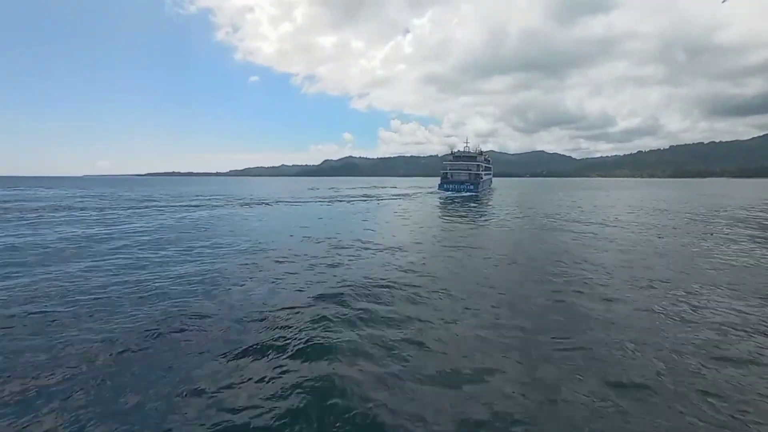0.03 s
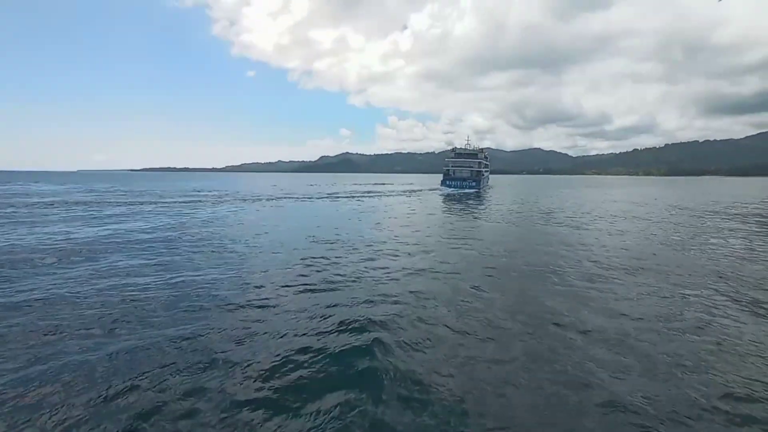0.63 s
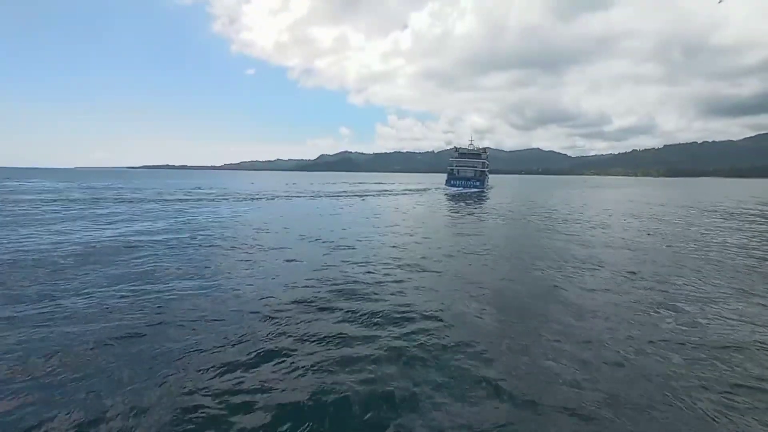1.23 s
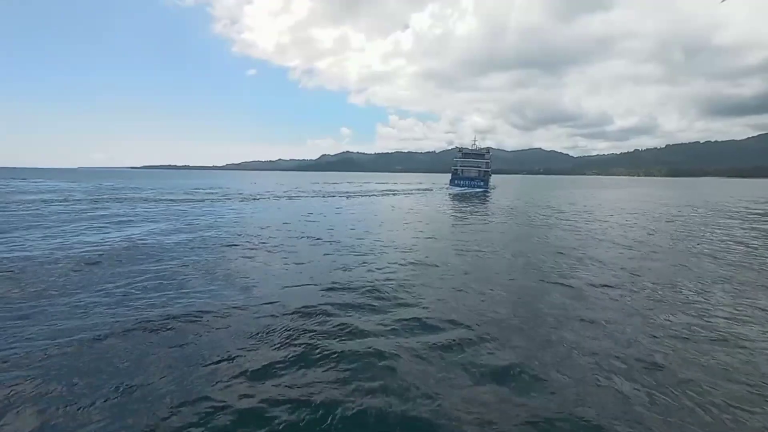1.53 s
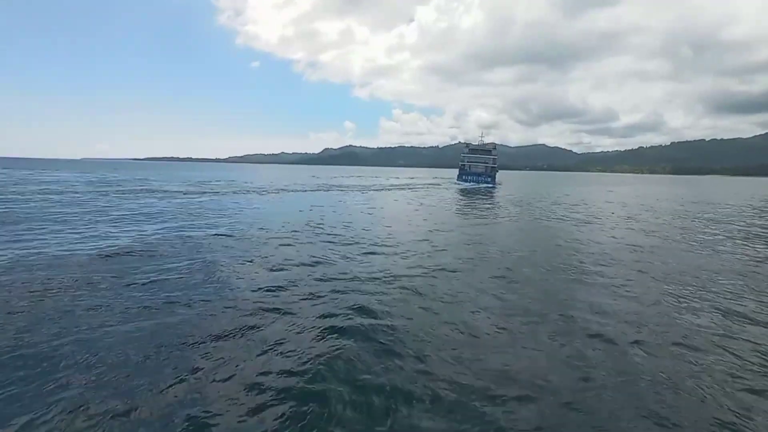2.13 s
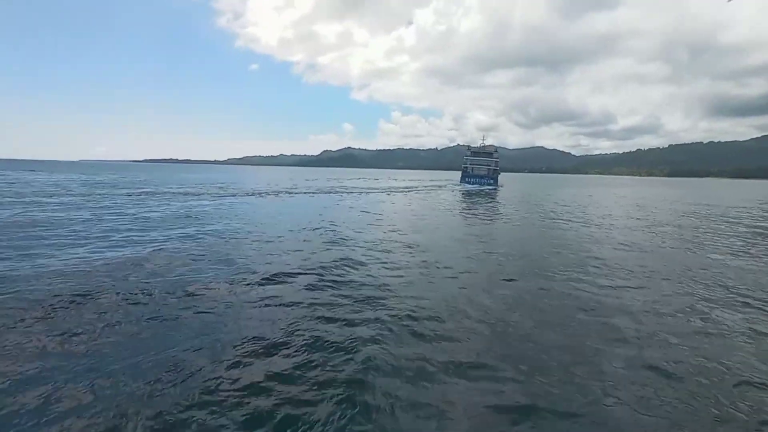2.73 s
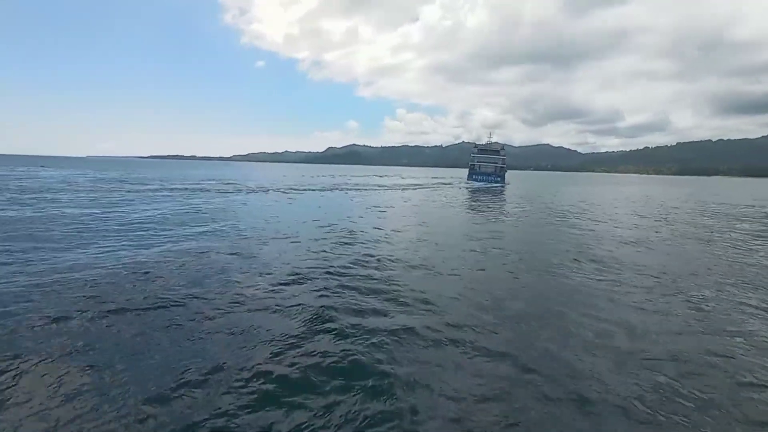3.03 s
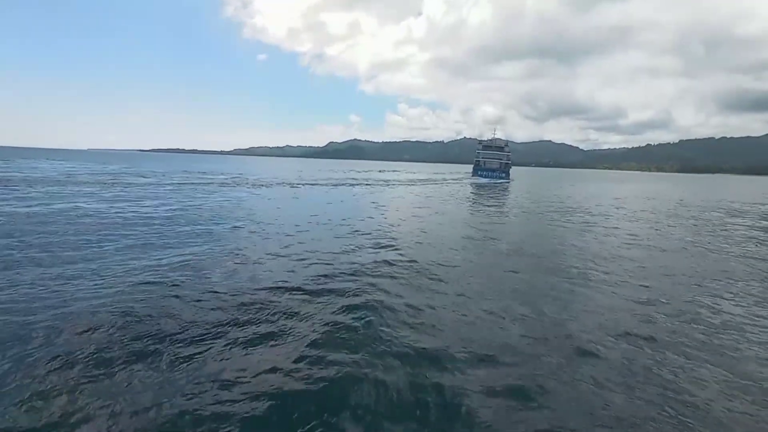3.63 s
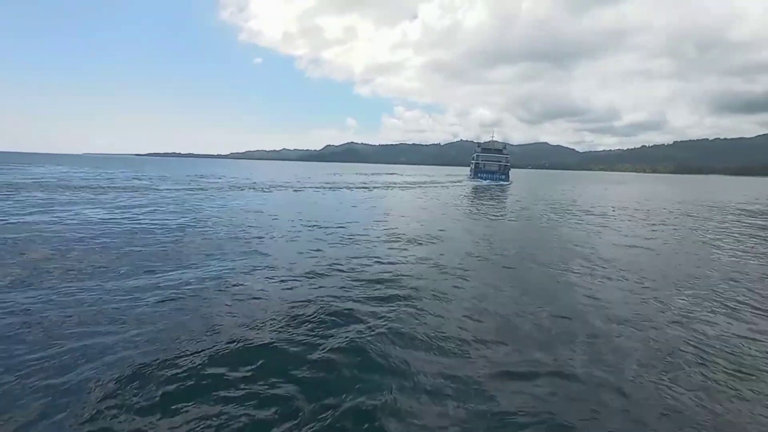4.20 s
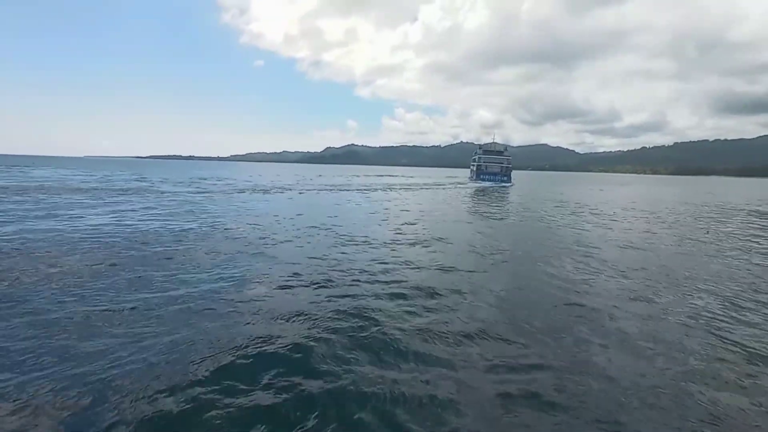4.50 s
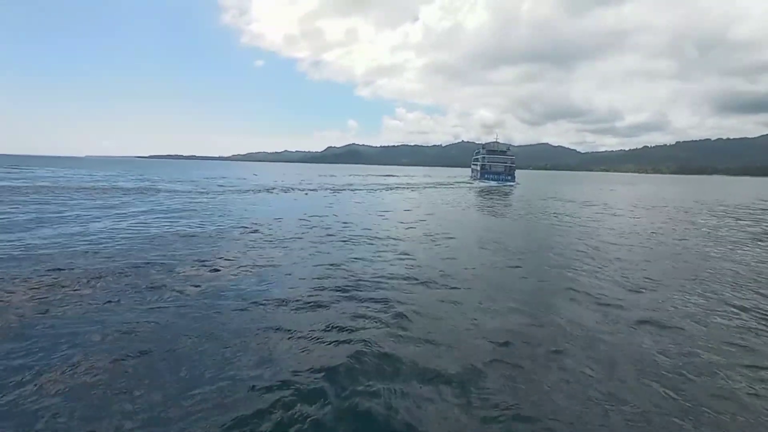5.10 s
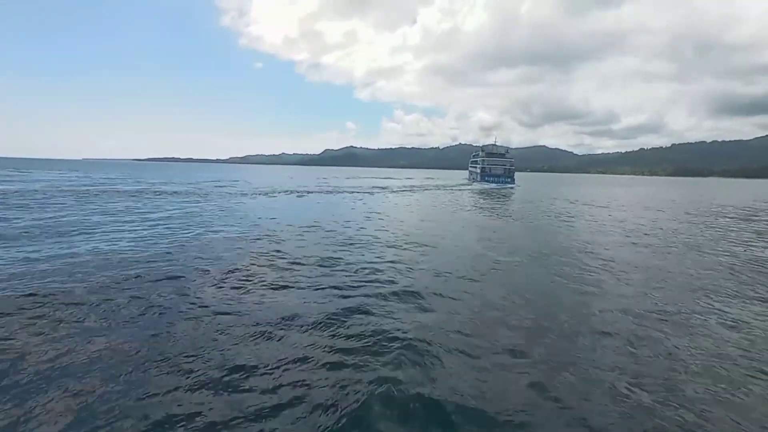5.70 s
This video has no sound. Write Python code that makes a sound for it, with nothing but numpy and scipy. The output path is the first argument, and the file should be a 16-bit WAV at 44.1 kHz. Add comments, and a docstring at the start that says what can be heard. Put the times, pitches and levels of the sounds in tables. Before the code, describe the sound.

Two diesel boat engines drone with a pulsing beat and raspy exhaust, while wind buffets the microphone over a hissing wake.

```python
"""At the stern of a motor boat under way on calm open water, on one microphone in the open air.
From the start two diesels run at slightly different speeds, so their drones beat against each other,
and the exhausts rasp over the hiss of the wake. Wind buffets the microphone, hardest around two
seconds in. By five seconds it has died down, and near the end a last wavelet breaks in the wake."""
import sys
import numpy as np
from scipy import signal
from scipy.fft import rfft, irfft
from scipy.io import wavfile
from scipy.ndimage import uniform_filter1d

SR = 44100
rng = np.random.default_rng(int(sys.argv[2]) if len(sys.argv) > 2 else 0)


def log_audio(samples):
    """Write samples as a 16-bit WAV file to the path given in sys.argv[1]."""
    # one column per channel
    frames = np.atleast_2d(samples).T
    # limit to full scale, then quantise
    limited = np.clip(frames, -1, 1)
    pcm = np.round(limited * 32767).astype(np.int16)
    wavfile.write(sys.argv[1], SR, pcm)


N = 262395
TIME = np.arange(N) / SR
HZ = np.fft.rfftfreq(N, 1 / SR)

# Each governor holds its engine's speed closely. Each row: time in seconds, crank speed in rpm.
PORT_RPM = [(0, 1237.4), (.53, 1245.7), (3.84, 1246.2), (5.1, 1254.6)]
STARBOARD_RPM = [(0, 1192.3), (1.05, 1187.6), (2.9, 1193.8), (5, 1193.7), (5.95, 1197.8)]
PORT_START, STARBOARD_START = .282, .946  # share of a cycle done at the start
# Both engines boom equally loud, so the beat is deep. Each row: time in seconds, level in dB.
BOOM_LEVEL = [(0, -26.5), (.7, -22), (4.6, -24.5), (5.3, -27), (5.95, -23)]
# The rest of each drone. Each row: multiple of the four-stroke cycle rate, level in dB.
PORT_HARMONICS = [(7, -44), (8, -26), (10, -38.5), (11, -42.5), (12, -31.5), (13, -31.5), (14, -42.5),
                  (16, -32.5), (19, -40), (20, -42.5), (22, -47), (23, -42), (24, -38.5), (25, -40.5)]
STARBOARD_HARMONICS = [(7, -45), (8, -42), (9, -32), (11, -40.5), (12, -34), (13, -37.5), (14, -39.5),
                       (15, -39.5), (19, -42.5), (20, -38.5), (21, -42), (22, -43.5), (23, -41.5),
                       (24, -43), (25, -37.5), (28, -44)]
# The exhausts as heard from the stern. Each row: frequency in Hz, relative level in dB.
RASP_SPECTRUM = [(200, -29), (290, -18.5), (380, -17.5), (450, -4), (490, -7.5), (528, 2.5), (565, -5),
                 (615, -4.5), (690, -12.5), (780, -14), (900, -30.5), (1300, -36.5), (2500, -73)]
# One gust at the microphone builds and drops away. Each row: time in seconds, relative level in dB.
WIND_STRENGTH = [(0, -29.5), (1.2, -30), (2.1, -25.5), (4.2, -33.5), (4.9, -41), (5.95, -36)]
# The hardest eddies. Each row: time of the peak in seconds, strength in dB, half length in seconds.
HARD_EDDIES = [(.117, -22, 0.02), (.466, -19.5, .022), (1.156, -17.5, .034), (1.308, -23, .025),
               (1.44, -16.5, 0.026), (1.661, -19.5, .017), (1.871, -24, .016), (1.947, -21.5, .013),
               (2.045, -20.5, .021), (2.086, -17.5, 0.027), (2.339, -19, 0.019), (2.473, -17.5, 0.021),
               (2.625, -18, 0.031), (2.784, -21, 0.019), (2.922, -22, 0.023), (3.047, -23.5, 0.012),
               (3.093, -22, 0.013), (3.599, -23, .029)]
# Wind on the microphone, as a dull push and a quick flutter, and the rumble of hull and air flow.
# Each row: frequency in Hz, relative level in dB.
PUSH_SPECTRUM = [(20, -29), (50, -16.5), (80, -6), (125, -7), (160, -10.5), (200, 0), (290, -1.5),
                 (450, -5.5), (620, -7.5), (800, -22.5), (1200, -35.5), (2200, -52), (5000, -87.5)]
FLUTTER_SPECTRUM = [(250, -21.5), (550, 5), (900, 6), (1300, -5), (1900, -9.5), (3000, -29.5),
                    (5000, -63.5), (9000, -87.5)]
RUMBLE_SPECTRUM = [(15, -20), (30, -20.5), (50, -14), (70, -1.5), (95, 1), (125, 3.5), (155, -6.5),
                   (185, -3.5), (250, -7.5), (320, -17), (500, -23.5), (1000, -69)]
# Peaks and notches of the microphone's housing. Each row: centre in Hz, width in Hz, gain in dB.
HOUSING_RESONANCES = [(1240, 110, 3), (1370, 92, -3.5), (1770, 390, -0.5), (2132, 98, -7.5),
                      (2540, 110, 2.5), (2840, 68, -3.5), (3860, 45, -2), (8230, 240, 4.5)]
# The hiss of the wake astern. Each row: frequency in Hz, relative level in dB.
WAKE_SPECTRUM = [(300, -0.5), (800, -1.5), (1000, -4.5), (1700, -1.5), (2600, -1.5), (3200, -3.5),
                 (4200, -13), (5000, -29.5), (6000, -30.5), (7200, -26), (8800, -25), (10000, -33.5),
                 (12000, -45.5), (15500, -47)]
# Wavelets breaking in the wake. Each row: time of the peak in seconds, extra level in dB.
WAVELETS = [(1.88, 1.5), (2.17, 1.5), (5.52, 2.5)]
# Pitches at which the churning water sings. Each row: pitch in Hz, width in Hz, relative level in dB.
GURGLE_BANDS = [(1267, 65, -54), (1608, 60, -56), (2480, 89, -52.5), (2660, 54, -56.5), (3180, 110, -58.5)]
# Chirps in the wash. Each row: time of the peak in seconds, pitch in Hz, level in dB, half length in seconds.
WASH_CHIRPS = [(2.82, 8280, -63, 0.015), (4.054, 2300, -47, .018), (4.812, 4200, -53, 0.033),
               (5.31, 2580, -41, 0.011), (5.37, 1515, -41, 0.018)]
# Machinery whining in the background. Each row: pitch in Hz, level in dB.
WHINE_TONES = [(4676, -77), (5218, -83.5)]


def drone(rpm, start, harmonics, booming_order, waver):
    """One engine's low orders: the boom and the next loudest follow the crank, the hull scatters the rest."""
    cycle = cycles(rpm, start)
    tones = gain_of(over_time(BOOM_LEVEL)) * np.cos(2 * np.pi * booming_order * cycle)
    loudest_first = sorted(harmonics, key=lambda row: -row[1])
    for rank, (order, db) in enumerate(loudest_first):
        scatter = 2 * np.pi * rng.random() + waver * wander(2) if rank else 0
        tones += gain_of(db) * np.cos(2 * np.pi * order * cycle + scatter)
    return np.sqrt(2) * tones


def exhaust(rpm, start, level_db, rough, puff_share, lope_db, limp_db, cylinders=8):
    """Each cylinder fires a puff of gas; part of it repeats every cycle, part is fresh turbulence."""
    cycle = cycles(rpm, start)
    pattern = rng.standard_normal(1024)
    repeating = np.interp(cycle % 1, np.linspace(0, 1, len(pattern)), pattern)
    turbulence = 2 * rng.standard_normal(N)
    gas = np.sqrt(1 - rough) * repeating + np.sqrt(rough) * turbulence
    firing = np.exp(-(cylinders * cycle % 1) / puff_share)
    # unequal cylinders make the rasp lope once a cycle and limp once a turn of the crank
    uneven_db = lope_db * np.cos(2 * np.pi * cycle) + limp_db * np.cos(4 * np.pi * cycle)
    return gain_of(level_db) * coloured(gas * firing * gain_of(uneven_db), spectrum_db(RASP_SPECTRUM))


def pipe_tone(level_db, flicker_db, waver, order=53):
    """The starboard order that falls on the exhaust pipe's resonance stands raggedly out of the rasp."""
    phase = 2 * np.pi * order * cycles(STARBOARD_RPM, STARBOARD_START) + waver * wander(12)
    return gain_of(level_db) * unit_rms(gain_of(flicker_db * wander(13)) * np.cos(phase))


def wind(roar_db, lumpy_db, rumble_db, rumble_share):
    """A lumpy roar right on the microphone follows the wind; the rumble under it follows only in part."""
    strength_db = over_time(WIND_STRENGTH)
    roar = gain_of(roar_db + strength_db + lumpy_db * wander(21)) * noise(spectrum_db(PUSH_SPECTRUM))
    gust_db = strength_db - strength_db.mean()
    rumble = gain_of(rumble_db + rumble_share * gust_db) * noise(spectrum_db(RUMBLE_SPECTRUM))
    return roar + rumble


def eddies(push_db, flutter_db, ragged_db, small_eddy_s=.01, db_per_halving=12.5):
    """Each eddy strikes the microphone with a ragged dull push; the smaller it is, the more it flutters."""
    push, flutter = np.zeros((2, N))
    for peak_s, db, half_s in list(HARD_EDDIES) + lesser_eddies():
        pressure = gain_of(db) * surge(peak_s, rise_s=.8 * half_s, fade_s=1.1 * half_s)
        smallness_db = db_per_halving * np.log2(small_eddy_s / half_s)
        push = np.hypot(push, pressure)  # eddies add in power
        flutter = np.hypot(flutter, pressure * gain_of(smallness_db))
    ragged = unit_rms(gain_of(ragged_db * wander(70)))
    push *= gain_of(push_db) * ragged * noise(spectrum_db(PUSH_SPECTRUM))
    flutter *= gain_of(flutter_db) * noise(spectrum_db(FLUTTER_SPECTRUM) + housing_db())
    return push + flutter


def lesser_eddies(per_s=4.5, over_wind_db=6, spread_db=1.5, typical_half_s=.024, count=40):
    """Rows of weaker eddies at loose intervals, their strength following the wind that carries them."""
    place, strength, size = rng.random((count, 3)).T
    peak_s = (np.arange(count) + place) / per_s
    db = over_time(WIND_STRENGTH, peak_s) + over_wind_db + spread_db * (2 * strength - 1)
    half_s = typical_half_s * 2 ** (size - .5)
    return [row for row in zip(peak_s, db, half_s) if row[0] < N / SR]


def wake(level_db, patchy_db):
    """Foam astern hisses in drifting patches of pitch."""
    hiss = noise(spectrum_db(WAKE_SPECTRUM) + housing_db())
    bands = signal.stft(hiss, nperseg=512, noverlap=384)[2]
    patches = uniform_filter1d(rng.standard_normal(bands.shape), size=4, axis=0)  # smooth in pitch
    patches = unit_rms(uniform_filter1d(patches, size=22, axis=1))  # and in time
    foam = signal.istft(bands * gain_of(patchy_db * patches), nperseg=512, noverlap=384)[1][:N]
    return gain_of(level_db) * unit_rms(foam)


def heave(swing_db, period_s, crest_s):
    """Gain of foam and gurgles: it rises and falls with the swell, and surges where a wavelet breaks."""
    level_db = swing_db * np.cos(2 * np.pi * (TIME - crest_s) / period_s)
    for peak_s, db in WAVELETS:
        level_db += db * surge(peak_s, rise_s=.033, fade_s=.16)
    return gain_of(level_db)


def gurgles(drift_hz, flicker_db):
    """Narrow fuzzy tones of the churning water, each wavering and swelling by itself."""
    water = np.zeros(N)
    for hz, width_hz, db in GURGLE_BANDS:
        carrier = np.exp(2j * np.pi * np.cumsum(hz + drift_hz * wander(8.13)) / SR)
        fuzz = wander(width_hz / 2) + 1j * wander(width_hz / 2)
        water += gain_of(db) * unit_rms((carrier * fuzz).real * gain_of(flicker_db * wander(9.6)))
    return water


def chirps(fall_per_s, fuzz):
    """Short high notes out of the wash, sliding down by a share of their pitch each second."""
    notes = np.zeros(N)
    for peak_s, hz, db, half_s in WASH_CHIRPS:
        t = TIME - peak_s
        phase = 2 * np.pi * hz * (t - fall_per_s * t ** 2 / 2) + fuzz * wander(120)
        notes += gain_of(db) * surge(peak_s, half_s, half_s) * np.sqrt(2) * np.cos(phase)
    return notes


def whines(drift_hz, flicker_db):
    """Faint high machinery tones behind everything else, wavering in pitch and level."""
    tones = np.zeros(N)
    for hz, db in WHINE_TONES:
        level = gain_of(db + flicker_db * wander(3))
        phase = 2 * np.pi * np.cumsum(hz + drift_hz * wander(14)) / SR
        tones += level * np.sqrt(2) * np.cos(phase)
    return tones


def housing_db():
    """The colour that the housing around the microphone gives to hiss and flutter."""
    return sum(db * np.exp(-((HZ - hz) / width) ** 2) for hz, width, db in HOUSING_RESONANCES)


def cycles(rpm, start):
    """Four-stroke cycles done so far: one for two turns of the crank."""
    return start + np.cumsum(over_time(rpm)) / (120 * SR)


def surge(peak_s, rise_s, fade_s):
    """A bell-shaped rise and fall that peaks at one."""
    return np.exp(-((TIME - peak_s) / np.where(TIME < peak_s, rise_s, fade_s)) ** 2)


def wander(rate_hz):
    """Random drift at unit rms, moving up to about the given rate."""
    lowpass = (HZ > 0) / (1 + (HZ / rate_hz) ** 4)
    return unit_rms(irfft(rfft(rng.standard_normal(N)) * lowpass, N))


def noise(db):
    """Noise with the given spectrum, at unit rms."""
    return coloured(rng.standard_normal(N), db)


def coloured(x, db):
    """Filters x by a spectrum and scales it to unit rms."""
    return unit_rms(irfft(rfft(x) * gain_of(db), N))


def spectrum_db(points):
    """Joins the rows of a spectrum along a log-frequency axis."""
    hz, db = np.transpose(points)
    return np.interp(np.log(HZ + 1), np.log(hz + 1), db)


def over_time(points, seconds=TIME):
    """Joins rows of time and value with straight lines."""
    return np.interp(seconds, *np.transpose(points))


def gain_of(db):
    """Decibels to amplitude."""
    return 10 ** (np.asarray(db) / 20)


def unit_rms(x):
    """Scales to an rms of one."""
    return x / np.sqrt(np.mean(x ** 2) + 1e-20)


def scene():
    """Both engines, the wind and the wake, at one microphone on the stern."""
    port = drone(PORT_RPM, PORT_START, PORT_HARMONICS, booming_order=15, waver=.5)
    starboard = drone(STARBOARD_RPM, STARBOARD_START, STARBOARD_HARMONICS, booming_order=16, waver=.29)
    shake_db = 1.3  # moving air between exhausts and microphone shakes both drones alike
    engines = (port + starboard) * unit_rms(gain_of(shake_db * wander(21)))
    rasp = exhaust(PORT_RPM, PORT_START, level_db=-35, rough=.6, puff_share=.43, lope_db=5, limp_db=4)
    rasp += exhaust(STARBOARD_RPM, STARBOARD_START, level_db=-33.5, rough=.44, puff_share=.33,
                    lope_db=1.7, limp_db=.5)
    rasp += pipe_tone(level_db=-37.5, flicker_db=4.5, waver=.7)
    water = wake(level_db=-41.5, patchy_db=1.5) + gurgles(drift_hz=22.05, flicker_db=3)
    water *= heave(swing_db=.56, period_s=5.5, crest_s=1.4)
    water += chirps(fall_per_s=.6, fuzz=.81)
    air = wind(roar_db=-1, lumpy_db=3, rumble_db=-31.5, rumble_share=.74)
    air += eddies(push_db=2, flutter_db=-.5, ragged_db=3.5)
    return (engines + rasp + air + water + whines(drift_hz=9, flicker_db=1))[None]


def record(dry):
    """The recorder cuts off steeply at the top of its band."""
    edge_hz = 15500
    return signal.sosfiltfilt(signal.butter(14, edge_hz, fs=SR, output="sos"), dry)


dry = scene()
out = record(dry)
log_audio(out)
```